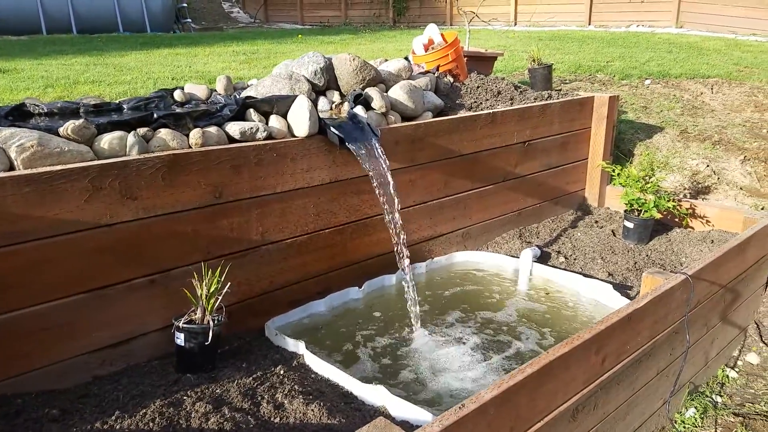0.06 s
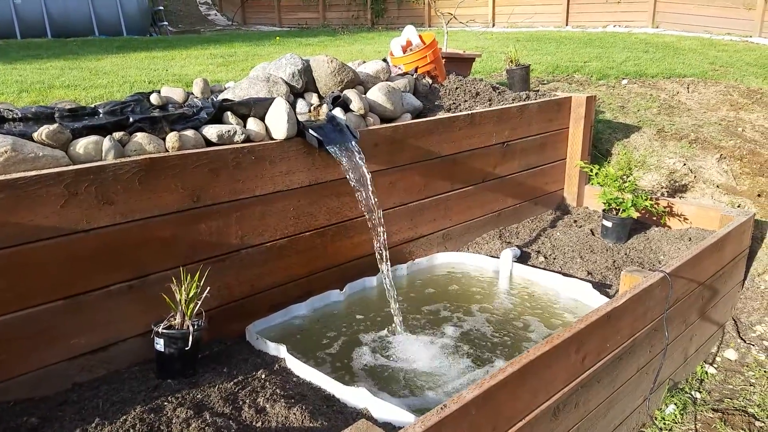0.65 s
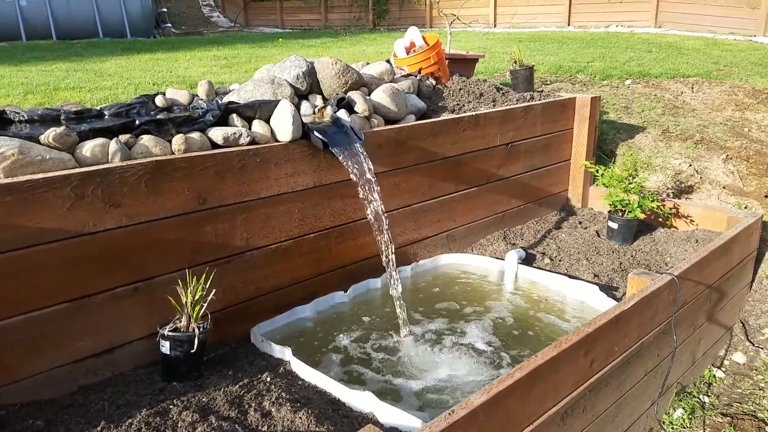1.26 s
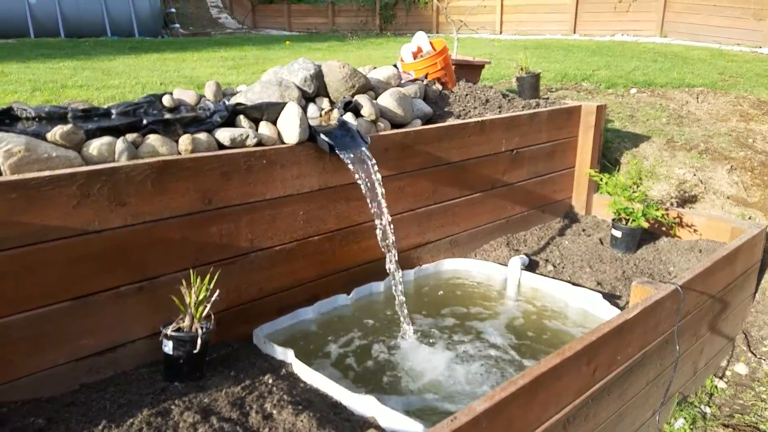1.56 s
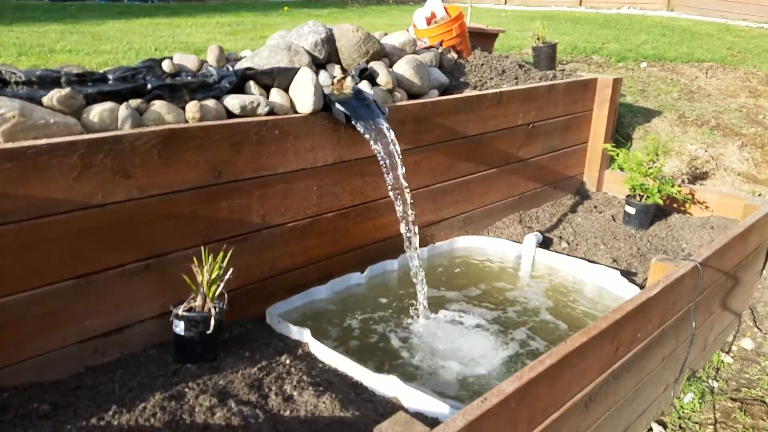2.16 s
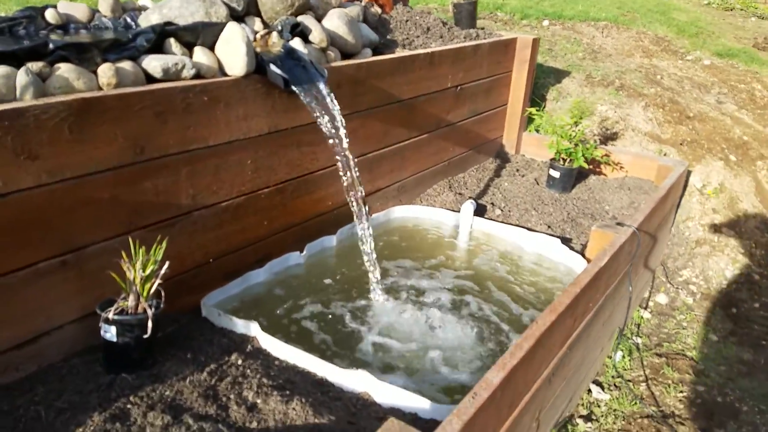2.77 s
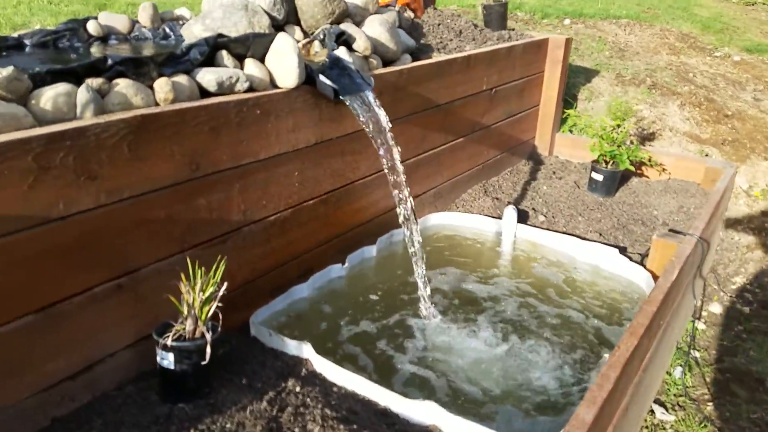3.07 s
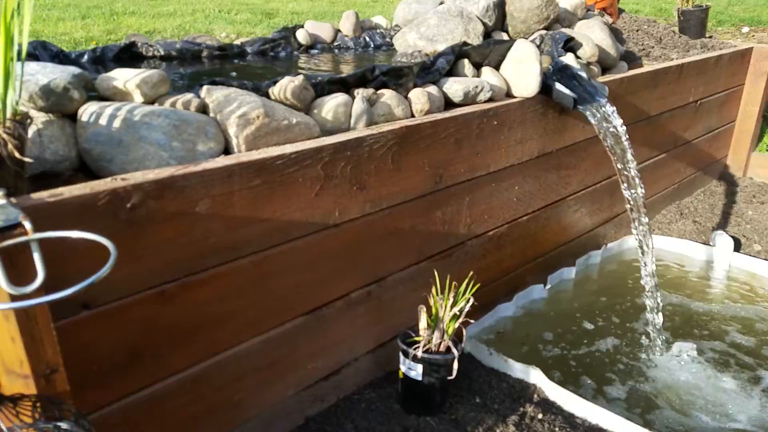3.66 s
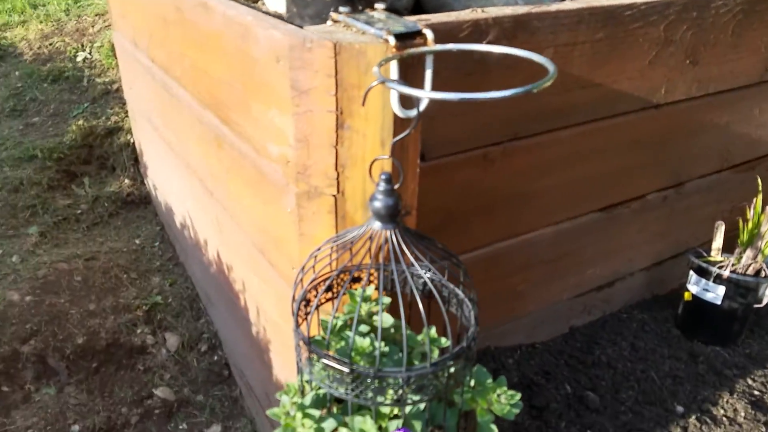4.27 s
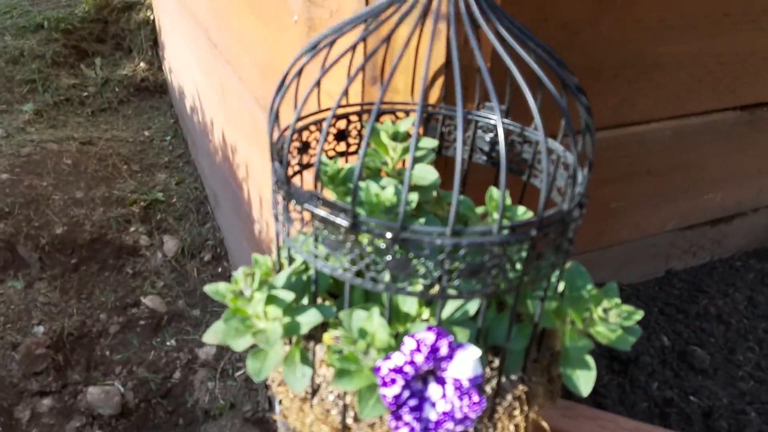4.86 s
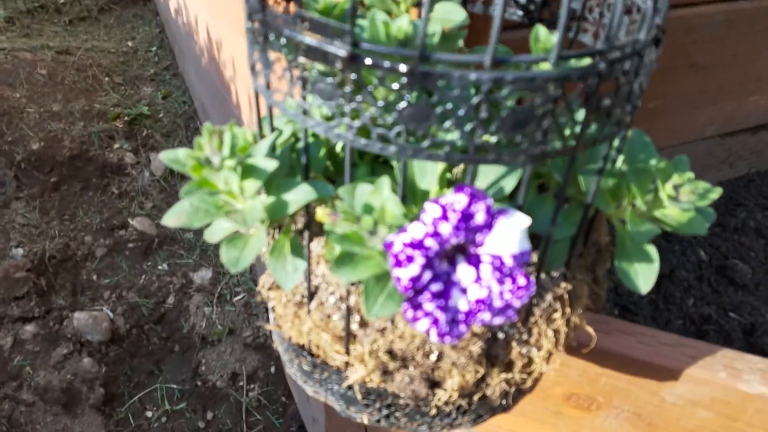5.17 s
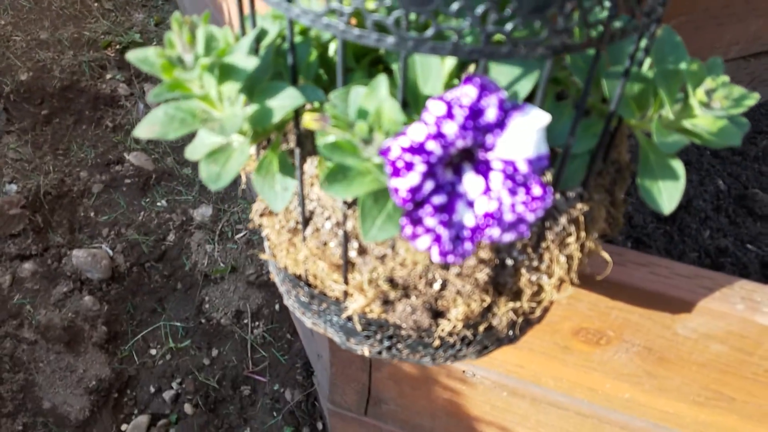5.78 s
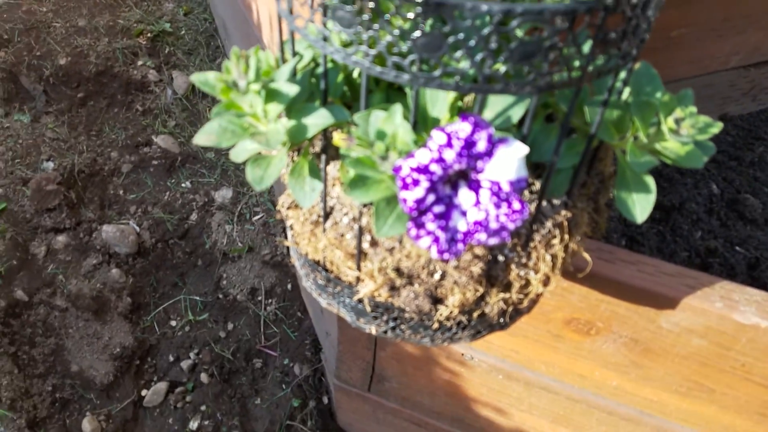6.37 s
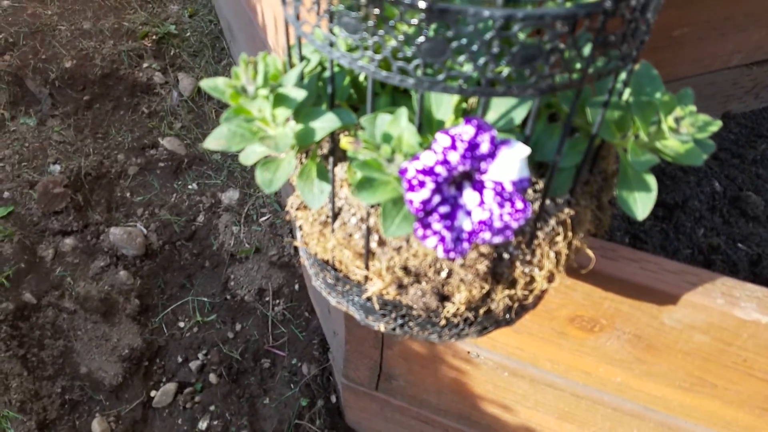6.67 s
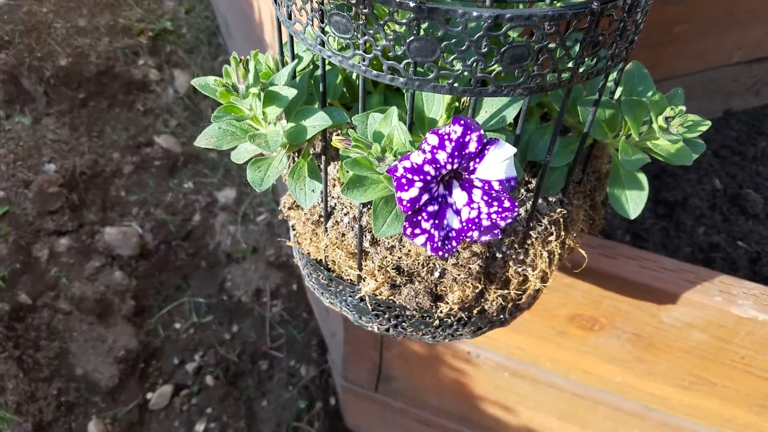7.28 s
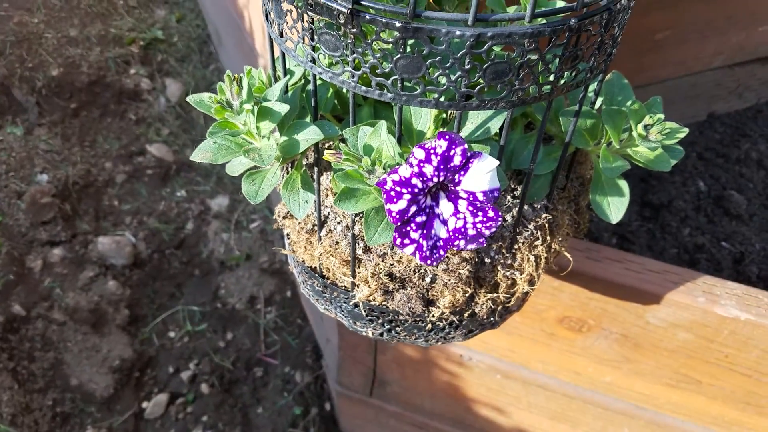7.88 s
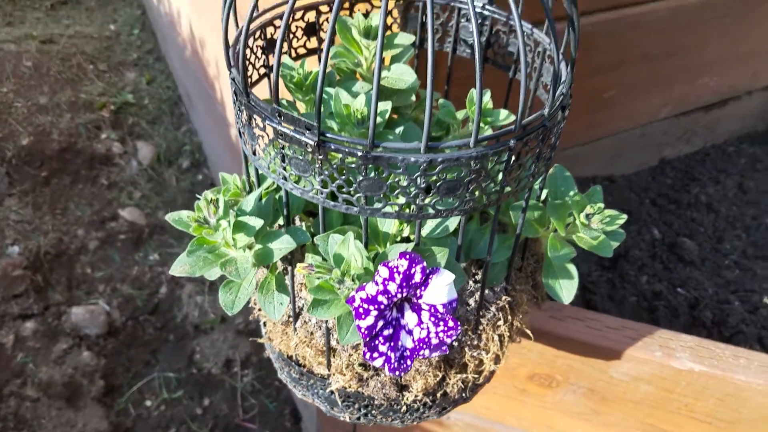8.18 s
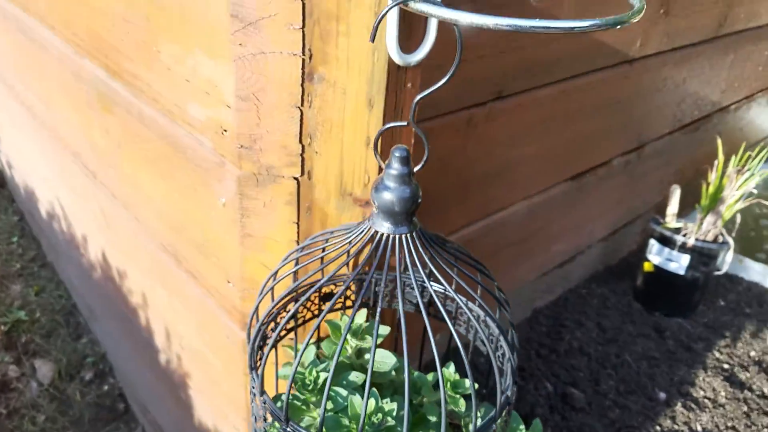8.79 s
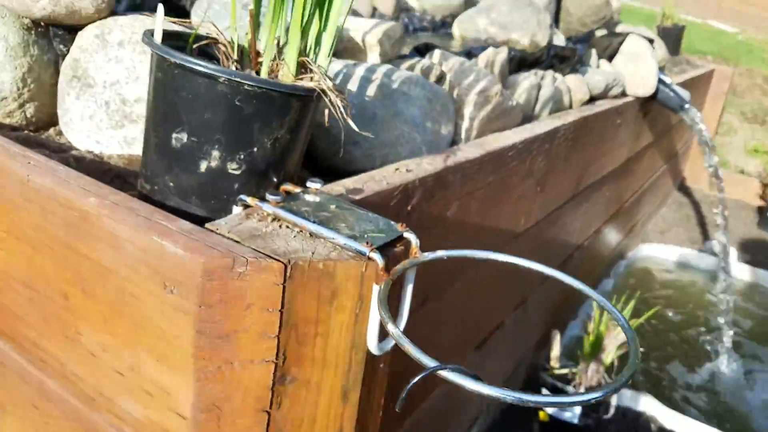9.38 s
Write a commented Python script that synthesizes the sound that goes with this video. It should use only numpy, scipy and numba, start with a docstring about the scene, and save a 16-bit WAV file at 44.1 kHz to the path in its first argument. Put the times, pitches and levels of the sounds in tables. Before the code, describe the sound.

Water from a spout splashes into a backyard basin with continuous gurgles, plops and fizzing spray, its tone growing boxier midway.

```python
"""A stream of water falls from a spout into a plastic pond basin between timber walls in a garden.
It drives air under, and each bubble rings as a damped oscillator; droplets thrown up by the splash
patter back as fizz and fine spray. The listener walks along a wall, whose echo draws closer and
interferes with the direct sound, then crouches behind a corner post, where the splash turns boxy.
A faint rumble and hum lie beneath, and the left microphone pops once near the start."""
import sys
import numpy as np
from scipy import signal
from scipy.fft import rfft, irfft, next_fast_len
from scipy.io import wavfile
from numba import njit

SR = 44100
rng = np.random.default_rng(int(sys.argv[2]) if len(sys.argv) > 2 else 0)


def dump_mix(stems):
    """Bounce the given channels to the path in sys.argv[1] as a 16-bit WAV at rate SR."""
    frames = np.atleast_2d(stems).T  # one column per channel
    limited = np.clip(frames, -1, 1)  # hard clip at full scale
    pcm = np.round(limited * 32767).astype(np.int16)
    wavfile.write(sys.argv[1], SR, pcm)


N = 416304

# the listener's path: (time [s], echo delay [ms], echo strength [0-1], left ear lag [ms],
# screening by the post [0-1])
WALK = [(0, 1.79, 0.9, -0.064, 0.02), (2.0, 1.74, 0.63, 0.02, 0.02), (2.5, 1.59, 0.64, -0.073, 0.05),
        (3.0, 1.52, 0.5, 0.064, 0.2), (3.5, 1.11, 0.4, 0.12, 0.3), (4.0, 0.84, 0.36, 0.32, 0.17),
        (4.4, 0.72, 0.08, 0.35, 0.4), (4.9, 0.6, 0.11, 0.38, 0.75), (8.0, 0.72, 0.15, 0.39, 0.94),
        (8.7, 0.51, 0.26, 0.31, 0.57), (9.44, 0.45, 0.48, 0.27, 0.23)]
# relative levels of the steady pour: (time [s], bubbles [dB], fizz [dB], spray [dB])
POUR_LEVELS = [(0.05, -41.5, -40.5, -49.5), (0.99, -40.5, -44.5, -51.5), (2.0, -40.5, -44.5, -49.5),
               (2.5, -39.5, -45, -51.5), (3.5, -39, -43, -48), (3.9, -40, -44, -49),
               (5.17, -41.5, -46.5, -51.5), (7.7, -41.5, -46.5, -52.5), (8.97, -38.5, -45, -50),
               (9.2, -38, -45.5, -51)]
# thick lumps of the stream land: (time [s], bubble boost [dB], droplet boost [dB])
SURGES = [(0.013, 11, 1), (0.08, -1, 3.5), (0.204, -7, 10.5), (0.28, 9, 7), (0.401, -3, 8),
          (0.572, -13, 5.5), (0.655, 4, 5.5), (0.793, 4, 7), (0.896, 5, 8), (1.045, 1, 1.5), (1.184, 2, 3),
          (1.252, 5.5, 2), (1.46, -2, 1.5), (1.54, 0, 1), (1.604, 3, 7.5), (1.655, 7, -2), (1.70, 2, 0),
          (1.803, 4, 6), (1.975, 3, 4.5), (2.07, 1, -2), (2.371, 1, 3), (2.59, 5, 0), (2.875, 6, 5),
          (3.078, 3, 3), (3.203, 1.5, -4), (3.32, 3, -2), (3.675, 10, 1), (4.002, 2, 1), (4.176, 8, -3),
          (4.254, 6, 2.5), (4.382, 10.5, 4.5), (4.535, 0, 5.5), (4.657, 8, 0), (4.744, 9.5, -0.5),
          (4.836, 9.5, 2), (4.955, 2, 2.5), (5.101, 9.5, 3), (5.84, 10, -0.5), (5.98, 2, 2),
          (6.172, 7, 4.5), (6.392, 8.5, 3), (6.49, 6.5, 4), (6.74, 8, 2.5), (6.872, 5, 0), (7.852, 0, 1.5),
          (8.03, 7, 2), (8.095, 5, -1), (8.181, 3, 2), (8.465, 7, 3), (8.487, 6, 5.5), (8.582, 8.5, 3),
          (8.66, 0, 1), (8.86, 7, -1), (9.107, -2, 5), (9.173, 3, 1.5), (9.303, 0, 6.5), (9.415, 6, 6.5)]
# the stream thins: (middle time [s], duration [s])
LULLS = [(0.476, 0.028), (0.605, 0.033), (0.95, 0.028), (1.142, 0.022), (1.386, .045), (1.498, 0.013),
         (1.754, .01), (1.866, 0.027), (2.044, 0.039), (2.122, 0.028), (2.398, 0.03), (2.677, 0.035),
         (2.96, 0.017), (3.038, 0.024), (3.462, 0.022), (3.754, 0.019), (3.81, 0.025), (4.072, 0.034),
         (4.28, 0.017), (4.413, 0.025), (4.803, 0.012), (4.876, 0.012), (5.05, 0.044), (5.728, 0.05),
         (6.125, .05), (6.445, 0.018), (6.895, 0.022), (7.617, 0.025), (7.795, 0.042), (8.336, 0.02),
         (8.433, .01), (8.629, .015), (8.944, 0.027), (9.022, .015), (9.277, .015)]
# spectral shapes of the bubbling, fizz, open spray and spray behind the post: (frequency [Hz], gain [dB])
BUBBLE_SPECTRUM = [(120, -23.5), (220, -13.5), (420, -10.5), (550, 0.5), (800, 4), (1200, -0.5), (1500, 3),
                   (2300, -1), (3200, -6), (4500, -19.5)]
FIZZ_SPECTRUM = [(600, -11), (1800, 6.5), (3300, 3), (4300, 0.5), (5700, -4), (7300, -3), (8200, -6),
                 (9000, -26), (11000, -18)]
SPRAY_SPECTRUM = [(2000, -1), (5000, -7.5), (7300, 3), (8400, 6.5), (9300, -2.5), (10800, 2.5), (13000, 4),
                  (15500, -2), (17000, 0.5)]
SCREENED_SPRAY_SPECTRUM = [(2000, 3.5), (5000, 5.5), (8200, -1.5), (9100, -7), (10700, 1), (11700, -5),
                           (12500, -2), (13500, -3), (15200, 5), (17000, -14)]
# the left ear is turned away from the water: (frequency [Hz], left minus right [dB])
HEAD_SHADOW = [(150, -0.5), (650, -1.5), (1200, -5), (1900, -4.5), (2400, -8), (3400, -5), (4500, -10),
               (7300, -13), (8500, -2.5), (9300, 1), (11000, -2.5), (13000, -1), (15500, -7)]
# strength of the ambient rumble: (time [s], relative level [dB])
RUMBLE_LEVELS = [(0, -53.5), (.6, -53), (.95, -59.5), (2.5, -59), (4, -57), (9.44, -63.5)]
# spectral shape of the rumble: (frequency [Hz], gain [dB])
RUMBLE_SPECTRUM = [(15, -43), (45, -36), (75, 2), (105, -3.5), (150, -9), (250, -1.5), (500, -0.5),
                   (900, -16), (2000, -78)]
# spells of faint hum: (start time [s], duration [s], frequency [Hz], relative level [dB])
HUMS = [(0, 0.8, 97, -59), (5.798, 0.61, 98, -62), (7.472, 0.2, 75, -64), (7.82, 0.45, 98.5, -62.5),
        (8.85, 0.26, 73, -72)]
# big cavities close: (time [s], relative level [dB], frequency [Hz])
PLOPS = [(0.089, -16, 2270), (0.141, -17, 2200), (0.192, -16, 2820), (0.338, -17, 1630), (0.472, -22, 2180),
         (0.513, -23, 1160), (0.5684, -18, 2450), (0.646, -23, 1140), (0.672, -17.5, 2250),
         (0.7267, -13.5, 1580), (0.7824, -21, 1150), (0.972, -24, 1700), (1.215, -20, 1750),
         (1.3154, -21, 1720), (1.5287, -18, 2280), (1.549, -20, 1170), (1.803, -27, 1150),
         (1.966, -25, 1190), (2.1517, -22, 1830), (2.218, -29, 1720), (2.2593, -11, 1600),
         (2.4444, -18.5, 1240), (2.618, -20, 1420), (2.8003, -14.5, 1910), (2.8758, -23.5, 1900),
         (2.9851, -19, 2160), (3.078, -19.5, 1400), (3.1506, -17, 1340), (3.318, -21, 980),
         (3.6703, -12.5, 1330), (3.7851, -23, 925), (3.909, -20, 2250), (3.954, -33, 1030),
         (3.999, -24, 1070), (4.006, -25, 1080), (4.078, -22, 2400), (4.2556, -15.5, 2120),
         (4.385, -22, 2070), (4.654, -26, 3000), (4.72, -23, 1710), (4.8345, -22, 1640),
         (4.8977, -23, 2050), (4.907, -22, 1700), (5.0937, -17, 1560), (5.915, -25, 1810),
         (5.934, -27, 2250), (5.9694, -20, 1570), (5.9983, -22, 2200), (6.173, -20, 2100),
         (6.236, -21, 1990), (6.391, -18.5, 1840), (6.428, -23, 2440), (6.4855, -19, 1430),
         (6.545, -25, 1600), (6.6818, -23, 1650), (6.71, -21, 1690), (6.74, -24, 1850), (6.782, -26, 1690),
         (6.869, -19.5, 2010), (7.0, -24, 1920), (7.237, -22.5, 990), (7.4006, -21.5, 1920),
         (7.717, -29, 1010), (8.08, -24.5, 1020), (8.1046, -21, 1670), (8.184, -22.5, 1950),
         (8.404, -21, 1400), (8.487, -23, 1620), (8.583, -20, 2500), (8.794, -23, 990), (8.856, -23, 2930),
         (9.173, -22, 1850), (9.297, -21, 2320), (9.411, -22, 1990)]
# single drops smack down: (time [s], relative level [dB], lower band edge [Hz])
LONE_DROPS = [(0.229, -25, 3500), (0.4455, -31, 7000), (0.5725, -27, 6000), (0.8913, -28, 5000),
              (1.095, -25, 4000), (2.206, -29, 4000), (2.2788, -26, 5000), (2.5044, -26, 5000),
              (3.167, -26, 4000), (3.257, -27, 4000), (3.7845, -25, 5000), (4.038, -29, 4000),
              (4.169, -26, 3500), (4.657, -24.5, 3500), (4.835, -26, 2500), (5.094, -26, 2500),
              (5.0164, -24.5, 8000), (5.242, -29, 4000), (5.5694, -30, 8000), (5.7438, -31, 6000),
              (6.289, -31, 4000), (6.8645, -33, 4000), (6.9378, -23, 7500), (7.1742, -24.5, 8000),
              (7.224, -31, 5000), (7.403, -33, 6000), (7.441, -31, 4000), (7.457, -30, 3000),
              (7.588, -27, 4000), (7.669, -24.5, 4000), (7.967, -28, 4000), (8.463, -29, 6000),
              (8.5794, -27, 6000), (8.7945, -26, 5000), (8.8504, -24, 7000), (8.896, -28, 5000),
              (9.2009, -25, 8000), (9.3095, -25, 6000), (9.418, -25, 3000)]
# big bubbles in clear water: (time [s], relative level [dB], frequency [Hz])
LONE_BUBBLES = [(1.771, -39, 563), (2.30, -33.5, 590), (2.349, -33, 791), (2.568, -28, 760),
                (2.59, -33, 564), (4.114, -26.5, 572), (4.228, -30.5, 584), (4.688, -38, 540),
                (5.169, -34, 950), (7.052, -28.5, 900), (8.221, -33.5, 560), (9.047, -33, 514),
                (9.165, -32, 526), (9.235, -30, 780), (9.332, -33, 797), (9.375, -32.5, 570)]
# hollow response at the wall's corner and boxy response behind the post: (frequency [Hz], gain [dB])
CORNER_RESPONSE = [(500, 0), (750, -3), (950, -2.5), (1120, -5), (1380, 3), (1600, -3), (1850, -5),
                   (2040, 5), (2350, -4.5), (2950, 4), (3300, -4), (3700, 0), (16000, 0)]
NOOK_RESPONSE = [(120, 3), (330, 7), (530, 4.5), (640, -7), (720, -12), (850, -12), (935, -7), (1010, -1.5),
                 (1130, 7), (1240, 1), (1350, 6), (1480, -2.5), (1650, .5), (1780, 5), (1880, 0),
                 (2020, 1.5), (2200, -2), (2480, -1), (2680, -6), (3050, 3), (3400, 2), (3900, 2.5),
                 (4500, -1), (6000, 0), (16000, 0)]
# partials of one deep glug: (frequency [Hz], relative level [dB], time to decay by 60 dB [s])
GLUG_PARTIALS = [(306, -43, 0.028), (516, -28, 0.0098), (960, -30, 0.12)]

CUTOFF_HZ = 16000
TIME = np.arange(N) / SR


def from_db(db):
    """Amplitude ratio of a level in decibels."""
    return 10 ** (np.asarray(db) / 20)


def unit_rms(x):
    """Normalisation to a mean square of 1."""
    return x / np.sqrt(np.mean(x ** 2) + 1e-20)


def in_time(rows):
    """Linear interpolation of each column of a time table at every sample."""
    times, *columns = np.transpose(rows)
    return [np.interp(TIME, times, column) for column in columns]


def trapezoid(start, attack, hold, release):
    """Linear envelope from 0 to 1 and back; times in seconds."""
    corners = start + np.cumsum([0, attack, hold, release])
    return np.interp(TIME, corners, [0, 1, 1, 0])


def drift(corner_hz, hop=20, settle=2000):
    """Low-passed noise: a slow random fluctuation of unit rms."""
    pole = np.exp(-2 * np.pi * corner_hz * hop / SR)
    noise = rng.standard_normal(N // hop + settle + 2)
    slow = signal.lfilter([1], [1, -2 * pole, pole * pole], noise)[settle:]
    return np.interp(np.arange(N) / hop, np.arange(len(slow)), unit_rms(slow))


def high_pass(hz):
    """Second-order filter sections that attenuate below hz."""
    return signal.butter(2, hz, "high", fs=SR, output="sos")


def db_per_bin(points, size):
    """A response curve interpolated over log frequency at each bin of a Fourier transform."""
    hz, db = np.transpose(points)
    bin_hz = np.maximum(np.arange(size // 2 + 1) * SR / size, 1)
    return np.interp(np.log(bin_hz), np.log(hz), db)


def coloured(x, points, size=2048):
    """Minimum-phase filtering: folding the cepstrum makes the response causal."""
    cepstrum = irfft(np.log(from_db(db_per_bin(points, size))))
    cepstrum[1:size // 2] *= 2
    cepstrum[size // 2 + 1:] = 0
    kernel = irfft(np.exp(rfft(cepstrum)))
    return signal.oaconvolve(np.atleast_2d(x), kernel[None], axes=1)[:, :N].reshape(np.shape(x))


def delayed(x, ms):
    """Propagation delay that may vary with time."""
    return np.interp(TIME - ms / 1000, TIME, x)


def stream_surges(attack_s=0.024, release_s=0.02, lull_fade_s=0.0052):
    """Amplitude modulation: thick lumps raise, and thin spells lower, bubble and droplet levels in dB."""
    bubbles_db, droplets_db = np.zeros((2, N))
    for s, bubble_boost_db, droplet_boost_db in SURGES:
        lump = trapezoid(s - attack_s, attack_s, 0, release_s)
        bubbles_db += bubble_boost_db * lump
        droplets_db += droplet_boost_db * lump
    thin = sum(trapezoid(s - length / 2 - lull_fade_s, lull_fade_s, length, lull_fade_s)
               for s, length in LULLS)
    return bubbles_db - 4 * thin, droplets_db - 1.5 * thin


@njit
def damped_phasors(starts, lengths, phasors, steps, bends, n):
    """Superposition of damped sines: a step turns and shrinks each phasor, a bend raises its pitch."""
    out = np.zeros(n)
    for k in range(len(starts)):
        phasor, step = phasors[k], steps[k]
        for i in range(starts[k], starts[k] + lengths[k]):
            out[i] += phasor.imag
            phasor *= step
            step *= bends[k]
    return out


def bubbles(s, amplitude, hz, cycles, rise):
    """Bubble resonance: each decays by 60 dB over `cycles` periods as pitch climbs by the share `rise`."""
    turn = 2 * np.pi * hz / SR
    life = np.maximum(cycles, 1) * SR / hz
    starts = np.clip(s * SR, 0, N - 1).astype(np.int64)
    lengths = np.minimum(life, N - starts).astype(np.int64)
    steps = np.exp(1j * turn - np.log(1000) / life)
    bends = np.exp(1j * rise * turn / life)
    return damped_phasors(starts, lengths, amplitude + 0j, steps, bends, N)


def rounded_bubbles(s, amplitude, hz, cycles, rise, onset):
    """Gradual pinch-off: a ring in antiphase, lasting the share `onset` of a life, softens each start."""
    antiphase = bubbles(s, amplitude, hz, cycles * onset, rise * onset)
    return bubbles(s, amplitude, hz, cycles, rise) - antiphase


def bubble_crowd(flow, per_s, spread_db, cycles, rise, onset, band_hz):
    """A Poisson process of bubbles of random size and damping, with amplitudes that follow the flow."""
    born = np.flatnonzero(rng.random(N) < per_s / SR)
    strength, pitch, persistence, polarity = rng.random((N, 4))[born].T
    low_root, high_root = np.sqrt(band_hz)
    hz = (low_root + pitch * (high_root - low_root)) ** 2
    db = spread_db * np.minimum(-np.log(1 - strength), 3.5)
    tilt = hz ** .75  # evens out the energy per Hz
    amplitude = from_db(db) * np.sign(polarity - .5) * flow[born] * tilt
    return unit_rms(rounded_bubbles(born / SR, amplitude, hz, cycles * (.5 + persistence), rise, onset))


def slaps(flow, per_s, spread_db):
    """Impact: lumps of the stream strike the surface as very short, hence broadband, pulses."""
    hit = rng.random(N) < per_s / SR
    strength = from_db(spread_db * np.minimum(rng.exponential(1, N), 4))
    return unit_rms(hit * flow * strength * rng.choice([-1, 1], N))


def bubbling(flow, boost_db, gurgle_top_hz=677):
    """Air entrainment: bubbles in foam are damped quickly, while a few in clear water ring on."""
    foam = bubble_crowd(flow, per_s=1500, spread_db=.5, cycles=13.3, rise=.25, onset=.13,
                        band_hz=(162, 4820))
    clear = bubble_crowd(flow, per_s=200, spread_db=2.1, cycles=30, rise=.13, onset=.3,
                         band_hz=(400, 2700))
    impacts = slaps(flow, per_s=900, spread_db=3.5)
    crowd = foam + from_db(-1.5) * clear + from_db(-13) * impacts
    crowd = unit_rms(coloured(crowd, BUBBLE_SPECTRUM))
    # small bubbles follow each surge; the deep gurgle carries on beneath
    small = signal.sosfiltfilt(high_pass(gurgle_top_hz), crowd)
    return crowd + (from_db(boost_db) - 1) * small


def droplets(flow, per_s, spread_db, mist, coherence, burst_s=0.001):
    """Incoherent impacts add in energy: tiny noise bursts over a steady mist, partly alike in both ears."""
    hit = rng.random(N) < per_s / SR
    energy = hit * from_db(spread_db * np.minimum(rng.exponential(1, N), 4.5)) ** 2
    energy = signal.lfilter([1], [1, -np.exp(-1 / (burst_s * SR))], energy + 1e-18)
    _, _, lag_ms, _ = in_time(WALK)
    lag = np.round(lag_ms * SR / 1000).astype(int)
    right = rng.standard_normal(N)
    shared = np.array([right[(np.arange(N) - lag) % N], right])
    noise = np.sqrt(coherence) * shared + np.sqrt(1 - coherence) * rng.standard_normal((2, N))
    return flow * np.sqrt(energy / energy.mean() + mist) * noise


def fizz(spatter):
    """Impact noise of dense droplets falling back on the water, heard with the wall's reflection."""
    patter = droplets(from_db(.72 * spatter), per_s=2200, spread_db=4, mist=.6, coherence=.24)
    return unit_rms(wall_echo(coloured(patter, FIZZ_SPECTRUM), cutoff_hz=3130))


def spray(spatter):
    """Impact noise of the finest droplets, whose spectrum changes as the post screens them."""
    patter = droplets(from_db(2.4 * spatter), per_s=900, spread_db=3.5, mist=.98, coherence=.23)
    screening = in_time(WALK)[-1]
    in_the_open = unit_rms(coloured(patter, SPRAY_SPECTRUM))
    behind_post = unit_rms(coloured(patter, SCREENED_SPRAY_SPECTRUM))
    return (1 - screening) * in_the_open + screening * behind_post


def wall_echo(pair, cutoff_hz, left_lead_ms=0.08):
    """Comb filtering: a duller reflection interferes, and the notches sweep up as the wall nears."""
    echo_ms, strength, _, _ = in_time(WALK)
    left, right = signal.sosfiltfilt(signal.butter(2, cutoff_hz, fs=SR, output="sos"), pair)
    return pair + strength * np.array([delayed(left, echo_ms - left_lead_ms), delayed(right, echo_ms)])


def garden_paths(x, scatter_db=-16, scatter_t60_s=0.07, size=4096):
    """Multipath propagation: direct sound, the wall's echo and brief scattering from stones and soil."""
    _, strength, lag_ms, _ = in_time(WALK)
    early = wall_echo(np.array([delayed(x, lag_ms), x]), cutoff_hz=3400)
    tail = rng.standard_normal((2, size)) * from_db(-60 * TIME[:size] / scatter_t60_s)
    scatter = signal.oaconvolve(np.array([x, x]), unit_rms(tail) / np.sqrt(size), axes=1)[:, :N]
    return (early + from_db(scatter_db) * scatter) / np.sqrt(1 + strength ** 2)


def head_shadow(pair):
    """Interaural level difference: one ear loses the decibels the other gains, with no phase shift."""
    size = next_fast_len(N)
    balance_db = db_per_bin(HEAD_SHADOW, size)
    return irfft(rfft(pair, size) * from_db([balance_db / 2, -balance_db / 2]), size)[:, :N]


def rumble(waver_db=1.6):
    """Low-frequency ambient noise, largely coherent between the ears, with a slowly wavering level."""
    noise = rng.standard_normal(N) + .5 * rng.standard_normal((2, N))
    level_db = in_time(RUMBLE_LEVELS)[0] + waver_db * drift(1.6)
    return from_db(level_db) * unit_rms(coloured(noise, RUMBLE_SPECTRUM))


def hum(fade_s=0.1, waver_hz=1.92, uneven_db=3):
    """A faint low tone swells and fades under random frequency and amplitude modulation."""
    detune_hz = waver_hz * drift(4)
    out = np.zeros(N)
    for s, length, hz, db in HUMS:
        envelope = trapezoid(s - fade_s / 2, fade_s, length - fade_s, fade_s)
        tone = np.sqrt(2) * np.sin(2 * np.pi * np.cumsum(hz + detune_hz) / SR)
        out += from_db(db) * envelope * tone
    return from_db(uneven_db * drift(11)) * out


def random_plops(per_s, level_db, centre_hz, octaves, range_db=0.5):
    """A Poisson process of plops, weaker where the pour is fainter, as rows like those of PLOPS."""
    born = np.flatnonzero(rng.random(N) < per_s / SR)
    weakness, pitch = rng.random((N, 2))[born].T
    pour_db = in_time(POUR_LEVELS)[0]
    db = level_db + pour_db[born] - pour_db.mean() - range_db * weakness
    return np.transpose([born / SR, db, centre_hz * 2 ** (octaves * (pitch - .5))])


def plops(rise=0.12, trail_count=4, trail_s=0.016):
    """Cavity collapse: each snaps shut with a short ring and sheds a trail of weaker bubbles."""
    lesser = random_plops(per_s=7, level_db=-29, centre_hz=1663, octaves=1.42)
    gulps = random_plops(per_s=7, level_db=-35, centre_hz=517, octaves=.56)  # larger pockets of air
    s, db, hz = np.vstack([PLOPS, lesser, gulps]).T
    out = rounded_bubbles(s, from_db(db), hz, cycles=11.8, rise=rise, onset=.1)
    for late, pitch, weakness in rng.random((len(s), trail_count, 3)).transpose(1, 2, 0):
        amplitude = from_db(db - 10 - 20 * weakness)
        out += bubbles(s + trail_s * late, amplitude, hz * 2 ** (pitch - .5), cycles=39, rise=rise)
    return signal.sosfilt(high_pass(500), out)


def lone_drops(crack_s=0.0008, tail_s=0.0035, tail_db=-14, size=900):
    """Impact transients: each drop is band-limited noise with a sharp crack and a short tail."""
    out = np.zeros((2, N))
    envelope = np.exp(-TIME[:size] / crack_s) + from_db(tail_db) * np.exp(-TIME[:size] / tail_s)
    for s, db, low_hz in LONE_DROPS:
        band = signal.butter(1, [low_hz, min(2.3 * low_hz, CUTOFF_HZ)], "band", fs=SR, output="sos")
        smack = signal.sosfilt(band, envelope * rng.standard_normal((2, size)))
        start = int(s * SR)
        out[:, start:start + size] += from_db(db) * smack[:, :N - start]
    return out


def microphone_pop(s, rise_s=0.00017, bass_cut_hz=100):
    """Step response: the left microphone's signal jumps, and its bass cut pulls it back to rest."""
    step = np.clip((TIME - s) / rise_s, 0, 1)
    return np.array([signal.sosfilt(high_pass(bass_cut_hz), step), np.zeros(N)])


def lone_bubbles():
    """Light damping: big bubbles in clear water ring a round note, longer than those in the foam."""
    s, db, hz = np.transpose(LONE_BUBBLES)
    return rounded_bubbles(s, from_db(db + .5), hz, cycles=39, rise=.063, onset=.11)


def corner_and_nook(pair, note_hz=928, note_q=17):
    """Resonance: the splash turns hollow at the corner and boxy in the nook, where one note rings."""
    passing = trapezoid(start=4.05, attack=.21, hold=.25, release=.21)
    screening = in_time(WALK)[-1]
    note = signal.lfilter(*signal.iirpeak(note_hz, note_q, fs=SR), pair[1])
    nook = coloured(pair, NOOK_RESPONSE) + from_db(1.5) * note  # the note is alike in both ears
    pair = (1 - screening) * pair + screening * nook
    return (1 - passing) * pair + passing * coloured(pair, CORNER_RESPONSE)


def glug(s):
    """Free oscillation of one large pocket of air, ringing in three low partials."""
    hz, db, t60 = np.transpose(GLUG_PARTIALS)
    partials = bubbles(np.full(len(hz), s), from_db(db), hz, cycles=t60 * hz, rise=0)
    return signal.sosfilt(high_pass(220), partials)


def falling_water(sway_db=0.3, lumps_db=1.04, flutter_db=1.5):
    """Common modulation: the stream breaks into lumps that drive bubbles, fizz and spray together."""
    bubble_boost_db, droplet_boost_db = stream_surges()
    bubbles_db, fizz_db, spray_db = np.array(in_time(POUR_LEVELS)) + sway_db * drift(7.7)
    lumps, flutter = drift(21), drift(84)
    flow = from_db(lumps_db * lumps + flutter_db * flutter)
    spatter = unit_rms(.5 * lumps + flutter + .59 * drift(120))
    crowd = from_db(bubbles_db + 1) * bubbling(flow, bubble_boost_db)
    basin = garden_paths(crowd + from_db(1.5) * plops() + lone_bubbles() + glug(s=5.819))
    fizzing = from_db(fizz_db + droplet_boost_db + 2.5) * fizz(spatter)
    spraying = from_db(spray_db + droplet_boost_db + 5) * spray(spatter)
    return head_shadow(corner_and_nook(basin + fizzing) + spraying + from_db(2) * lone_drops())


def scene():
    """Superposition of the water, the faint surroundings and one pop."""
    water = falling_water()
    surroundings = (rumble() + hum()) * from_db([[1.2], [-1.5]])  # a little stronger on the left
    return water + surroundings + microphone_pop(s=.288)


def record(dry):
    """Band limiting: a steep elliptic low-pass removes the highest treble."""
    return signal.sosfilt(signal.ellip(12, .1, 80, CUTOFF_HZ, fs=SR, output="sos"), dry)


dry = scene()
out = record(dry)
dump_mix(out)
```